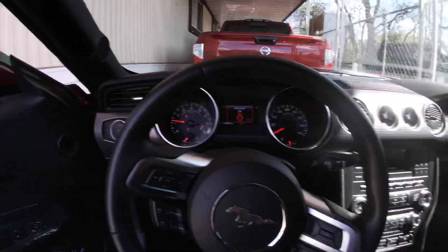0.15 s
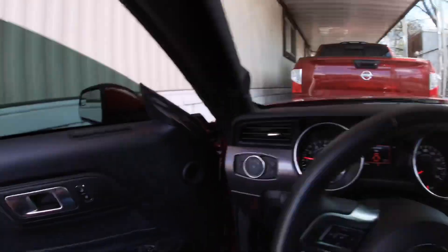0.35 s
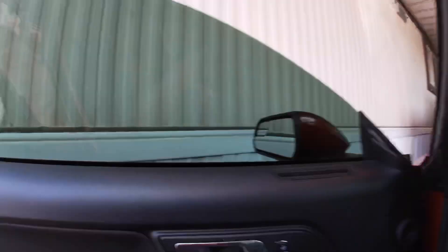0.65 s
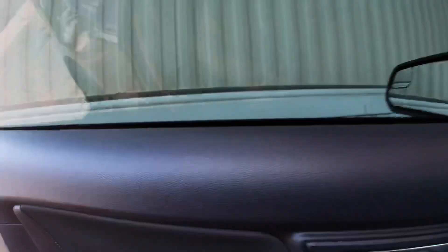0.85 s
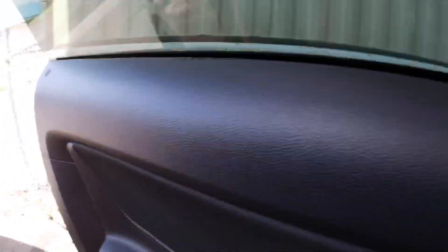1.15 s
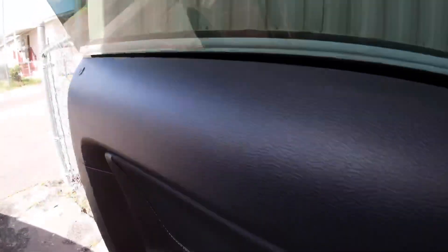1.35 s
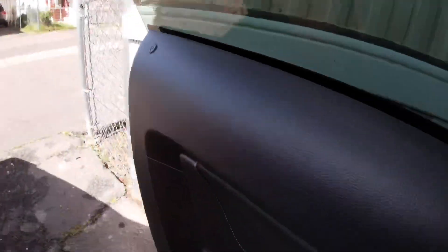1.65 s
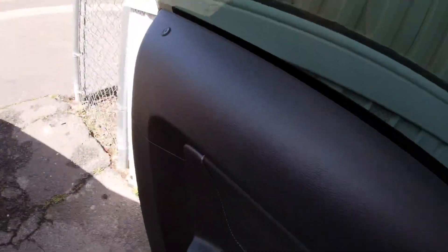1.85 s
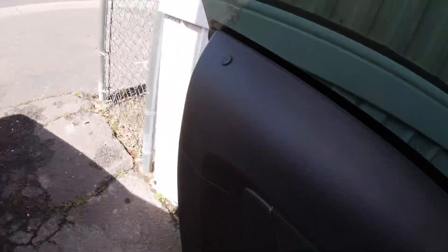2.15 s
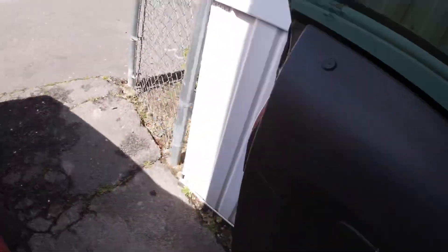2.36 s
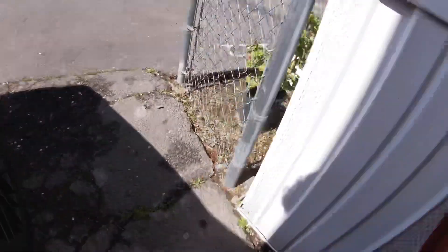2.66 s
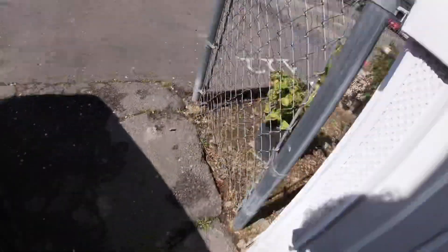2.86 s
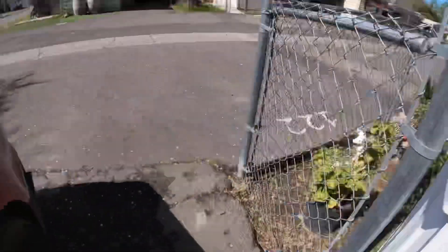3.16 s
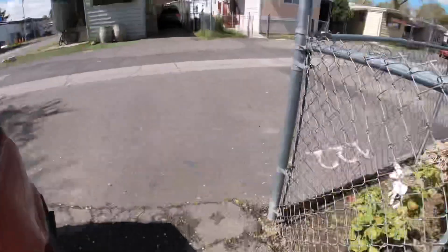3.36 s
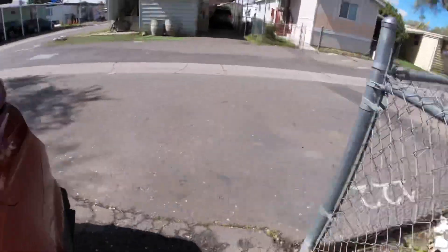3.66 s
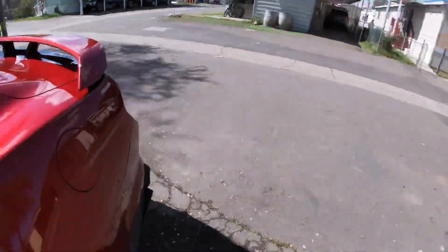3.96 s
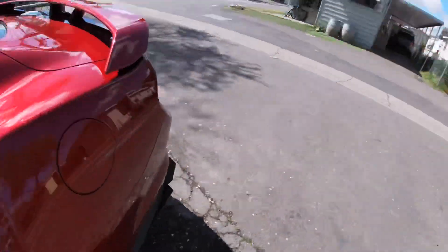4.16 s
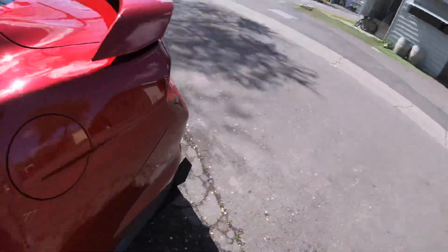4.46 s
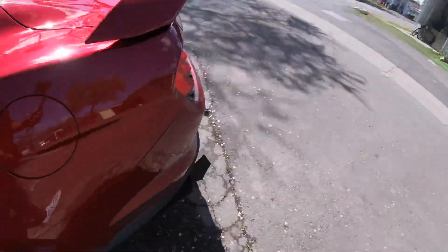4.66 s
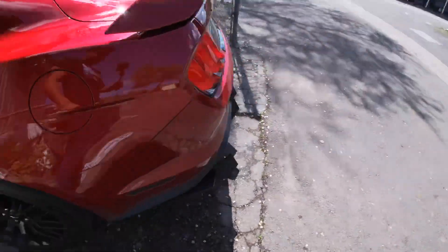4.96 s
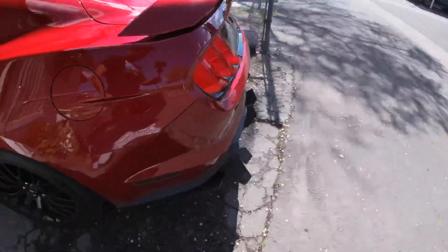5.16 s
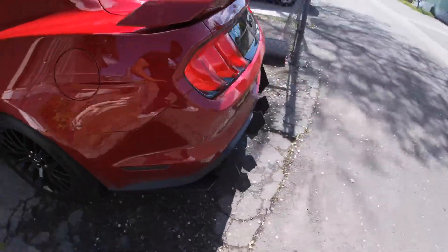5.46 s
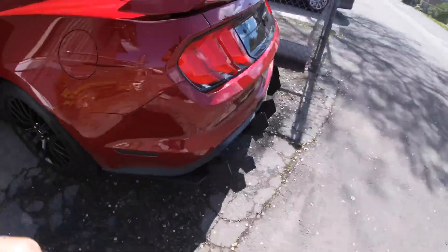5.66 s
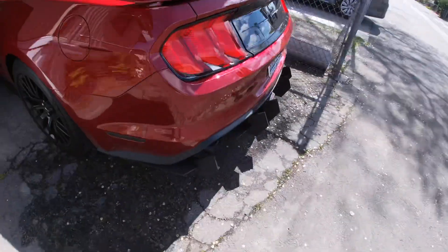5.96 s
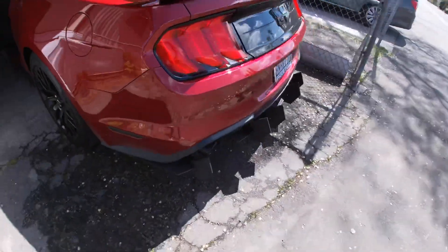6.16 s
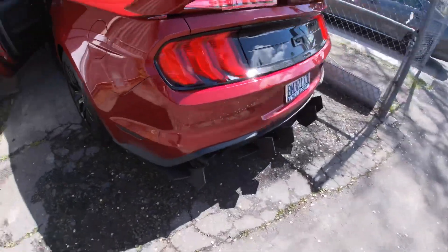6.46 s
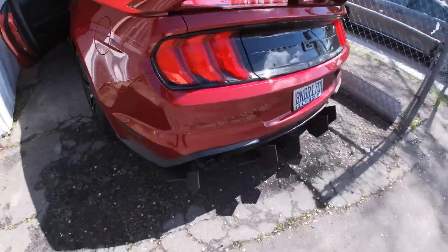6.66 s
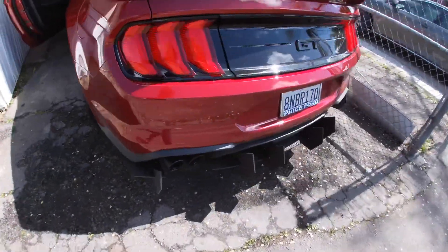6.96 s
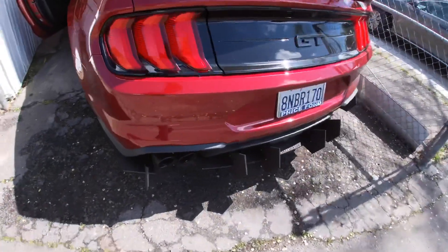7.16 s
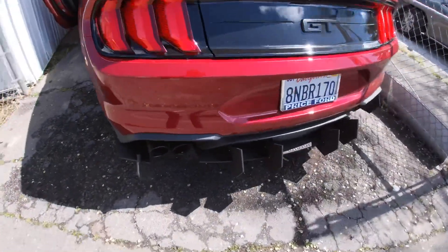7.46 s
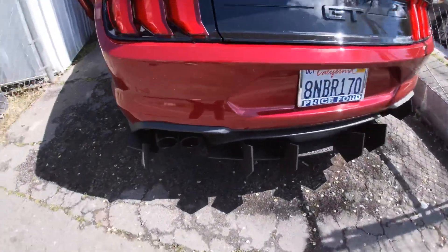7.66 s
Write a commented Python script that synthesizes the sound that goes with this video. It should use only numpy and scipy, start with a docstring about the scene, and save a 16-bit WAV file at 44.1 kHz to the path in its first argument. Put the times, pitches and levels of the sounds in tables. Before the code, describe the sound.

Steady uneven V8 idle, droning and boomy in the cabin with small bumps, moves outside and closes in on barking, hissing exhaust pipes.

```python
"""In and around a car, from the driver's seat, out of the open door, to the tailpipes: a cross-plane V8 idles fast and cold.
A microphone is carried along this way. Sines at multiples of the cycle rate make the low drone; eight uneven
blow-downs a cycle, as filtered clicks with turbulence, make a lumpy throb and a bark. Pulsing noise makes the
rasp of the gas jets, which grows near the pipes. Whirr rings narrow panel resonances, the engine bay hisses
and ticks in the distance, and short bursts of noise are bumps and scuffs on the way."""
import sys
import numpy as np
from scipy import signal
from scipy.fft import rfft, irfft
from scipy.io import wavfile
from scipy.ndimage import uniform_filter1d, minimum_filter1d, map_coordinates

SR = 44100
rng = np.random.default_rng(int(sys.argv[2]) if len(sys.argv) > 2 else 0)


def dump_mix(stems):
    """Bounce the given channels to the path in sys.argv[1] as a 16-bit WAV at rate SR."""
    frames = np.atleast_2d(stems).T  # one column per channel
    limited = np.clip(frames, -1, 1)  # hard clip at full scale
    pcm = np.round(limited * 32767).astype(np.int16)
    wavfile.write(sys.argv[1], SR, pcm)


N = 345120
T = np.arange(N) / SR  # seconds

# Idle speed, hunting a little as it settles. Each row: time in seconds, crankshaft speed in turns per minute.
IDLE_SPEED = [(0, 1277), (1.1, 1256.2), (1.5, 1268.9), (2, 1248.5), (2.4, 1256.7), (2.9, 1239.4),
              (3.2, 1259.5), (4.1, 1256), (4.5, 1234.9), (4.8, 1251.6), (6, 1244), (6.8, 1250.8),
              (7.5, 1233.6), (7.83, 1245.2)]
# Firing steps of the two cylinder banks, each firing at uneven gaps. Each row: one bank's steps in 1/8 cycle.
BANK_STEPS = ((1, 2, 5, 7), (0, 3, 4, 6))
# When each cylinder's pulse arrives, in firing order. Each entry: time in firing steps of 1/8 cycle.
ARRIVAL_STEPS = [.47, 1.52, 2.38, 3.5, 4.5, 5.42, 6.43, 7.42]

# The microphone's way. Each row: time in seconds, place (0 in the cabin, 1 beside the car, 2 behind it).
MIC_PLACE = [(0, 0.083), (2.3, 0.026), (3.2, 1.1), (4.7, 1.35), (5.5, 1.46), (6.6, 1.77), (7.83, 2.12)]
# Each row: time in seconds, distance from the microphone to the tailpipes in metres.
PIPE_DISTANCE = [(0, 2.95), (3.3, 2.68), (4.7, 1.78), (5.5, 1.28), (6.9, 0.9), (7.83, 0.71)]

# The throb swells and fades round the car. Each row: time in seconds, level in dB with the door open.
THROB_LEVEL_DB = [(0, -20.5), (2.5, -17), (3.25, -22.5), (3.8, -16), (5.1, -14.5), (6.2, -20),
                  (7.83, -26.5)]
# Each row: time in seconds, level of the bark in dB with the door open.
BARK_LEVEL_DB = [(0, -33), (1.2, -26.5), (2.1, -32.5), (2.65, -37.5), (2.88, -28.5), (3.2, -21),
                 (4.4, -25.5), (5.5, -20), (7.83, -19.5)]
# Colour of the throb at the three places. Each row: frequency in Hz, relative level in dB.
THROB_COLOUR_CABIN = [(120, -34.5), (200, -11), (232, -17), (285, -0.5), (350, -7), (450, -10), (620, -41),
                      (1060, -120)]
THROB_COLOUR_BESIDE = [(120, -31.5), (200, 0.5), (237, 0.5), (285, 8), (388, -6), (620, -49), (1060, -120)]
THROB_COLOUR_BEHIND = [(120, -50), (200, 1), (255, -2.5), (330, 3), (366, -3.5), (405, 6), (480, -1.5),
                       (620, -26), (1060, -120)]
# Colour of the bark at the same places. Each row: frequency in Hz, relative level in dB.
BARK_COLOUR_CABIN = [(250, -24.5), (430, 6.5), (482, 10), (555, 1), (620, -19), (904, -37), (1430, -64.5),
                     (2420, -120)]
BARK_COLOUR_BESIDE = [(250, -27), (420, 6), (549, 5.5), (615, 0), (680, 4), (794, -1.5), (1100, -14.5),
                      (1430, -40), (2420, -120)]
BARK_COLOUR_BEHIND = [(100, -33.5), (380, -5), (471, 0.5), (591, 1), (700, 3), (800, 7), (1020, -13.5),
                      (1100, -38.5), (2420, -120)]
# Strength of each cylinder in the throb, the bark and the gas jets.
# Each row: one place (cabin, beside, behind), relative level of the eight cylinders in dB, in firing order.
THROB_CYLINDER_DB = [(-1, 8.5, 1.5, -5.5, 3.5, 1.4, -5.5, 8.5), (-2.5, 3, 0.5, -4.5, 4, 1.7, -4.3, 7),
                     (0.7, -2, 4, 3, -4.5, 1.2, 1.5, -15.5)]
BARK_CYLINDER_DB = [(-1.5, 0, 4, -3, -2, 1, -2, 3), (-1.5, -1.5, 1.5, -2, 0, -3, 6.5, 1.1),
                    (-.5, -4, -3, 1.5, 3.5, -4, 8, -2)]
JET_CYLINDER_DB = [(0, -1, -1, 0, 0, 0, 3, 1), (1, 0, -.5, 0, 3, 0, 1, 1),
                   (2.5, -1.5, 1.5, 0, 4, 0, -.5, 2)]
# The band of throb, then of bark, that the path round the car reinforces.
# Each row: time in seconds, centre in Hz, gain of the added band in dB.
THROB_REINFORCED = [(0, 331, 16.5), (1.197, 405, -6), (2.502, 301, 4.5), (3.197, 302, -1), (3.9, 354, 7),
                    (5.101, 239, 14.5), (6.501, 304, 16.5), (7.83, 305, -20)]
BARK_REINFORCED = [(0, 615, 6.5), (1.2, 529, 15.5), (2.85, 576, 24.5), (3.099, 544, 14.5), (3.499, 515, 9),
                   (4.499, 557, -11.5), (5.399, 561, 0.5), (6.8, 602, 9), (7.5, 600, 11), (7.83, 570, -5)]

# Colour of the gas jets, low part and high part. Each row: frequency in Hz, relative level in dB.
RASP_COLOUR = [(700, -48.5), (1000, 8.5), (1250, 9.5), (1500, 7.5), (1700, 0), (2100, -4.5), (2700, -57)]
SIZZLE_COLOUR = [(1700, -26.5), (2250, 0), (2700, -4.5), (3300, -7), (4400, -21.5), (5300, -23),
                 (8500, -37), (10300, -47), (11500, -84.5)]
# Bands of jet noise that direct and reflected sound reinforce as the microphone moves.
# Each row: width in Hz, path of (time in seconds, centre in Hz, gain of the added band in dB).
JET_BANDS = [(82.5, [(1, 980, 1), (2.4, 1480, 6.5), (3.3, 1214, -23), (4, 1390, 3.5), (4.7, 1260, 15.5),
             (5.3, 1264, 5), (5.9, 1322, 7.5), (7.83, 1385, 9.5)]), (70, [(5.7, 1030, -4), (6.35, 997, 5),
             (7.2, 960, 1), (7.75, 885, 11)]), (130, [(4.2, 1967, -7), (4.7, 1670, 7), (5.7, 1787, 5),
             (7.83, 1940, 12.5)]), (219, [(5.3, 2126, -9), (6.4, 2040, 11.5), (6.85, 2380, 17),
             (7.83, 2500, 1.5)]), (130, [(4.3, 3570, -3), (5.9, 3400, 11.5), (7.2, 3170, 5)]),
             (200, [(4.3, 2780, -2), (5.3, 3020, -1)]), (201, [(4.6, 4420, -18.5), (5, 4220, 8.5),
             (7.6, 4130, 7.5)]), (1500, [(7.2, 6470, -34), (7.7, 6330, 3)])]
# Jets reflected by the ground, the bumper and the fence.
# Each row: delay at 1 m in ms, change of delay in ms per metre, gain as a factor.
JET_ECHOES = [(1.47, 0.159, 0.081), (3.599, .9, 0.21), (7.9, -.7, 0.34)]
# Bands of the exhaust that reflections cancel (or, above 0 dB, strengthen) along the walk.
# Each row: width in Hz, path of (time in seconds, centre in Hz, gain at the centre in dB).
EXHAUST_NOTCHES = [(131, [(2.5, 780, 7), (3.3, 784, -2), (4.2, 770, 2), (4.9, 972, -6), (6, 914, -10.5),
                   (6.8, 800, 0), (7.15, 805, -25.5), (7.83, 805, -5)]), (59, [(3, 401, 0.5),
                   (4.6, 384, -3.5), (7.83, 348, -3.5)]), (30, [(3.8, 526, -8.5), (5.6, 502, -9.5),
                   (7.2, 526, 8)]), (45, [(4.8, 604, 2.5), (6.7, 640, -6), (7.1, 690, 1.5)]),
                   (180, [(5.2, 2350, -8), (6.6, 2350, -7), (7.83, 2190, 0.5)]), (300, [(4.2, 3760, 0),
                   (6, 3580, 0), (7.83, 3800, -20)])]

# The three strongest multiples of the cycle rate.
DRONE_MULTIPLES = (8, 10, 14)
# Their standing waves along the walk. Each row: time in seconds, level of the 8th, 10th and 14th multiple in dB.
DRONE_LEVELS = [(0, -16.5, -19.5, -24), (0.498, -14, -31, -23), (2.498, -17, -21.5, -17.5),
                (3.6, -16.5, -20, -23.5), (5.2, -17, -24, -19), (6.098, -19, -21.5, -16),
                (7.83, -21, -20.5, -17)]
# Weaker multiples. Each row: multiple of the cycle rate, level in the cabin, beside and behind in dB.
WEAK_MULTIPLES = [(5, -37.5, -34.5, -37.5), (6, -40.5, -26.5, -30.5), (11, -27, -21.5, -71.5),
                  (12, -25.5, -36, -35), (15, -33.5, -54, -27), (16, -59, -39.5, -31),
                  (18, -36, -28.5, -41.5), (20, -33.5, -51, -37)]
# Whirr ringing in the dashboard and the door, swelling and fading as the microphone passes.
# Each row: half the width of either of two chained resonators in Hz,
# path of (time in seconds, centre in Hz, level in dB).
PANEL_RINGS = [(18, [(.6, 655, -38.5), (1.25, 650, -54.5), (2.05, 646, -38), (2.8, 660, -60.5)]),
               (22, [(.6, 900, -39.5), (1.9, 897, -56.5), (2.75, 885, -41), (3.4, 874, -46.5),
               (4.5, 920, -64)]), (25, [(.5, 853, -40), (1.6, 810, -65)])]
# Colour of fan, belts and intake. Each row: frequency in Hz, relative level in dB.
BAY_COLOUR = [(25, -8.5), (60, 23.5), (200, 4.5), (500, 4.5), (1500, -9.5), (2000, -18.5), (3000, -20),
              (4000, -23), (5700, -24), (7500, -39.5), (10000, -37.5), (12500, -65.5)]
# Bumps and scuffs of the hand, the door trim, clothing and shoes. Each row: start in seconds,
# level in dB before the swell and fade, band centre in Hz, rise and decay time constants in seconds.
HANDLING_BUMPS = [(.1, -17, 70, .0013, 0.013), (.25, -31, 1126, 0.083, 0.16), (.52, -54.5, 4940, 0.13, .2),
                  (.815, -33, 1126, 0.0081, .066), (2.2, -28, 894, 1, 0.66), (2.301, -47, 5100, .91, 0.38),
                  (3.998, -15, 1370, 0.0021, 0.0028), (5.453, -28.5, 1750, 0.002, 0.017)]

RASP_DB, SIZZLE_DB = -28.5, -38.5  # the gas jets, 1 m from the pipes
RASP_DB_PER_DOUBLING, SIZZLE_DB_PER_DOUBLING = -5, -10  # of distance; treble beams backwards, so falls faster
CORNER_M, SHADOW_M, SHADOW_DB = 2.12, 0.64, -8.5  # past the rear corner, over this stretch, the body shadows the rasp
DOOR_OPEN_S, DOOR_THROB_DB, DOOR_BARK_DB = 0.74, -4.5, -15.5  # fully open by then; shut, it holds back this much
CEILING, EDGE_HZ = .8, 14000  # limiter ceiling at full scale 1, upper edge of the band


def crank():
    """Engine cycles done so far, two crank turns each; the idle sways a little about its speed."""
    rpm, = curves(IDLE_SPEED)
    return np.cumsum(rpm) / (120 * SR) + .002 * drift(5)


def firings(cycles, scatter_s=0.00012):
    """Time, cylinder and luck of every blow-down; no two burns are quite alike."""
    turn, cylinder = np.divmod(np.arange(8 * 84), 8)
    late, luck = rng.standard_normal((len(turn), 2)).T
    due = turn + np.array(ARRIVAL_STEPS)[cylinder] / len(ARRIVAL_STEPS)
    when = np.interp(due, cycles, T, right=2 * T[-1])  # firings past the end fall out of hearing
    return when + scatter_s * late, cylinder, luck


def exhaust(cycles, fired):
    """All that leaves the pipes above the drone: the door holds back throb and bark, distance and body the jets."""
    (metres,), (throb_db,), (bark_db,) = curves(PIPE_DISTANCE), curves(THROB_LEVEL_DB), curves(BARK_LEVEL_DB)
    doublings = np.log2(metres)
    shut = np.clip(1 - T / DOOR_OPEN_S, 0, 1)
    shadow = np.clip((metres - CORNER_M) / SHADOW_M, 0, 1)
    rasp = colour(jets(cycles, fired, crack=.15, decay_s=.0037, between=.17), RASP_COLOUR)
    sizzle = colour(jets(cycles, fired, crack=0.038, decay_s=.0066, between=0.092), SIZZLE_COLOUR)
    rasp_db = RASP_DB + RASP_DB_PER_DOUBLING * doublings + SHADOW_DB * shadow
    sizzle_db = SIZZLE_DB + SIZZLE_DB_PER_DOUBLING * doublings
    return (gain_of(throb_db + DOOR_THROB_DB * shut) * throb(cycles, fired)
            + gain_of(bark_db + DOOR_BARK_DB * shut) * bark(cycles, fired)
            + gain_of(rasp_db) * steady(rasp)
            + gain_of(sizzle_db) * steady(sizzle))


def throb(cycles, fired):
    """Blow-downs boom in the mufflers and the body: clicks and churning gas, coloured low."""
    out = np.zeros(N)
    churn = .18 * turbulence(cycles, repeat=.85)
    colours = THROB_COLOUR_CABIN, THROB_COLOUR_BESIDE, THROB_COLOUR_BEHIND
    for share, spectrum, cylinder_db in zip(shares(), colours, THROB_CYLINDER_DB):
        # clicks start early because the steep colours delay them, so throb and bark land together
        clicks = pulses(fired, cylinder_db, uneven_db=.9, lead_s=.0045)
        drive = steady(clicks) + churn * gusts(clicks, decay_s=0.0099, between=1.0)
        out += share * steady(colour(drive, spectrum))
    return steady(out + reinforced(out, THROB_REINFORCED, width=100))


def bark(cycles, fired, echo=0.2, echo_s=0.00624):
    """The hard front of each pulse leaves the pipes: rougher far off, a firmer pop with one ground echo close by."""
    out, behind = np.zeros(N), shares()[2]
    churn = (.44 - .1 * behind) * turbulence(cycles, repeat=.8)
    leads_s = (.005, .0005, 0)  # the steep cabin colour delays the pulse, so its clicks start earlier
    colours = BARK_COLOUR_CABIN, BARK_COLOUR_BESIDE, BARK_COLOUR_BEHIND
    for share, spectrum, cylinder_db, lead_s in zip(shares(), colours, BARK_CYLINDER_DB, leads_s):
        clicks = pulses(fired, cylinder_db, uneven_db=1.4, lead_s=lead_s)
        drive = steady(clicks) + churn * gusts(clicks, decay_s=0.008, between=.9)
        out += share * steady(colour(drive, spectrum))
    out = out + reinforced(out, BARK_REINFORCED, width=92)
    ground_echo = np.interp(T - echo_s, T, out)
    return steady(out + echo * behind * ground_echo)


def jets(cycles, fired, crack, decay_s, between, muddle=0.47):
    """A crack and a puff of turbulent gas per cylinder, coloured by the path round the car."""
    places = inside, beside, _ = shares()
    clicks = sum(share * pulses(fired, cylinder_db, uneven_db=2.5)
                 for share, cylinder_db in zip(places, JET_CYLINDER_DB))
    clicks = clicks * gain_of(1.2 * drift(60))
    # away from the pipes, reflections fill the gaps between puffs
    flow = gusts(clicks, decay_s, between) + muddle * (inside + 1.1 * beside)
    puffs = steady(flow * turbulence(cycles, repeat=0.25))
    jet = puffs + crack * (1 - inside) * steady(clicks)
    return echoed(jet + sum(reinforced(jet, path, width) for width, path in JET_BANDS))


def hollowed(x):
    """Reflections against the direct sound cancel bands, or strengthen them, sliding as the microphone moves."""
    for width, path in EXHAUST_NOTCHES:
        hz, db = curves(path)
        x = x - (1 - gain_of(db)) * resonate(x, hz, width)
    return x


def drone(cycles, pipe_steps=(.24, .05), waver=0.14):
    """The lowest multiples of the cycle rate, timed by the two banks, whose pipes differ in length."""
    # pipe_steps: delay of each bank in firing steps
    steps = np.concatenate([np.add(bank, delay) for bank, delay in zip(BANK_STEPS, pipe_steps)])
    places, out = shares(), np.zeros(N)
    lines = list(zip(DRONE_MULTIPLES, curves(DRONE_LEVELS)))
    for multiple, *place_dbs in WEAK_MULTIPLES:
        lines.append((round(multiple), sum(share * db for share, db in zip(places, place_dbs))))
    for k, db in lines:
        lead = np.angle(np.sum(np.exp(-2j * np.pi * k * steps / len(steps))))
        level = np.sqrt(2) * gain_of(db) * (1 + waver * drift(110))
        out += level * np.sin(2 * np.pi * k * cycles + lead)
    return out


def dash(cycles, waver_db=1.2):
    """Whirr locked to the crankshaft rings narrow panel resonances, which waver."""
    whirr, out = turbulence(cycles, repeat=0.94), np.zeros(N)
    for width, path in PANEL_RINGS:
        hz, db = curves(path)
        ringing = resonate(resonate(whirr, hz, 2 * width), hz, 2 * width)
        out += gain_of(db + waver_db * drift(18)) * steady(ringing)
    return out


def bay(fired, outside_db=-34.75, cabin_extra_db=1.5, ticking=0.21):
    """Rush of fan and intake noise, with the ticks of the injectors at the firing times."""
    clicks = pulses(fired, np.zeros(len(ARRIVAL_STEPS)), uneven_db=2.5)
    ticks = gusts(clicks, decay_s=0.00032, between=0)
    rush = rng.standard_normal(N) * (1 + ticking * ticks)
    return gain_of(outside_db + cabin_extra_db * shares()[0]) * steady(colour(rush, BAY_COLOUR))


def bumps():
    """Knocks and scuffs: an octave of noise that swells and dies."""
    out = np.zeros(N)
    for s, db, hz, rise, decay in HANDLING_BUMPS:
        octave = signal.butter(3, [hz / np.sqrt(2), hz * np.sqrt(2)], "band", fs=SR, output="sos")
        noise = signal.sosfilt(octave, rng.standard_normal(N))
        age = np.maximum(T - s, 0)
        out += gain_of(db) * noise / noise.std() * np.exp(-age / decay) * (1 - np.exp(-age / rise))
    return out


def pulses(fired, cylinder_db, uneven_db, lead_s=0):
    """One click per blow-down, weighted by cylinder and by the luck of the burn."""
    when, cylinder, luck = fired
    at = np.round((when - lead_s) * SR).astype(int)
    heard = (at >= 0) & (at < N)
    strength = gain_of(np.array(cylinder_db)[cylinder] + uneven_db * luck)
    return np.bincount(at[heard], strength[heard], N)


def gusts(clicks, decay_s, between):
    """Gas flow: it surges at each click and dies away to a steady stream."""
    t = T[:SR // 20]
    flow = signal.oaconvolve(clicks, np.exp(-t / decay_s) - np.exp(-5 * t / decay_s))[:N]
    return steady(flow) + between


def turbulence(cycles, repeat, size=4230):
    """Noise of which a share comes back with every engine cycle, as each cylinder has its own path."""
    repeat = np.clip(repeat, 0, 1)
    locked = map_coordinates(rng.standard_normal(size), [cycles % 1 * size], order=3, mode="grid-wrap")
    return np.sqrt(repeat) * locked + np.sqrt(1 - repeat) * rng.standard_normal(N)


def resonate(x, hz, width):
    """A resonance of gain 1 at its centre, which may follow a curve."""
    turn = np.exp(2j * np.pi * np.cumsum(hz * np.ones(N)) / SR)
    r = np.exp(-np.pi * width / SR)
    # shift the centre down to 0 Hz, smooth, shift back
    return 2 * (turn * signal.lfilter([1 - r], [1, -r], x / turn)).real


def reinforced(x, path, width):
    """The band of x that reflections strengthen, moving as the microphone moves."""
    hz, db = curves(path)
    return gain_of(db) * resonate(x, hz, width)


def echoed(x):
    """Reflections comb the sound; the comb slides as the microphone closes in."""
    metres, = curves(PIPE_DISTANCE)
    out = x
    for ms, ms_per_m, gain in JET_ECHOES:
        delay_s = (ms + ms_per_m * (metres - 1)) / 1000
        out = out + gain * np.interp(T - delay_s, T, x)
    return out


def colour(x, points, size=8192):
    """A causal filter with the given spectrum: it rings after a pulse, never before."""
    hz, db = np.transpose(points)
    db = np.interp(np.log(abs(np.fft.fftfreq(size, 1 / SR)) + 1), np.log(hz + 1), db)
    log_gain = np.log(gain_of(np.maximum(db, -120)))
    taps = np.fft.ifft(np.exp(np.conj(signal.hilbert(log_gain)))).real  # minimum phase
    return signal.oaconvolve(x, taps[:size // 2] * np.hanning(size)[size // 2:])[:N]


def shares():
    """How much each of the three places (cabin, beside, behind) counts along the walk."""
    place, = curves(MIC_PLACE)
    return [np.clip(1 - abs(place - k), 0, 1) for k in range(3)]


def steady(x, size=8500):
    """Unit level over a couple of engine cycles; the single beats stay."""
    power = uniform_filter1d(uniform_filter1d(x ** 2, size), size)
    return x / np.sqrt(abs(power) + 1e-20)


def drift(hz):
    """Slow random wander of unit size, up to about hz."""
    lowpass = np.exp(-(np.fft.rfftfreq(N, 1 / SR) / hz) ** 2)
    x = irfft(rfft(rng.standard_normal(N)) * lowpass, N)
    return x / x.std()


def curves(rows):
    """Each column of a table, joined by straight lines in time."""
    s, *columns = np.transpose(rows)
    return [np.interp(T, s, c) for c in columns]


def gain_of(db):
    """Amplitude factor of a level in dB."""
    return 10 ** (np.asarray(db) / 20)


def scene():
    """One crankshaft drives every part of the engine's sound; the bumps come on top."""
    cycles = crank()
    fired = firings(cycles)
    pipes = hollowed(exhaust(cycles, fired))
    return (pipes + drone(cycles) + dash(cycles) + bay(fired) + bumps())[None]


def record(dry, size=120):
    """A quick limiter holds the highest peaks down; then the band limit."""
    room = np.minimum(1, CEILING / (abs(dry) + 1e-9))
    lowest = minimum_filter1d(room, size)
    held = dry * uniform_filter1d(uniform_filter1d(lowest, size // 2), size // 2)
    band = signal.firwin(511, EDGE_HZ, window=("kaiser", 9), fs=SR)
    return signal.oaconvolve(held, band[None], "same")


dry = scene()
out = record(dry)
dump_mix(out)
```